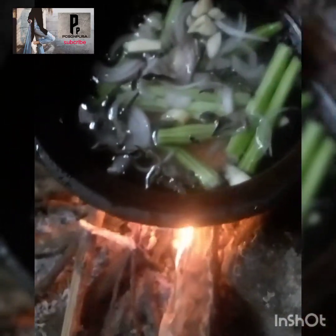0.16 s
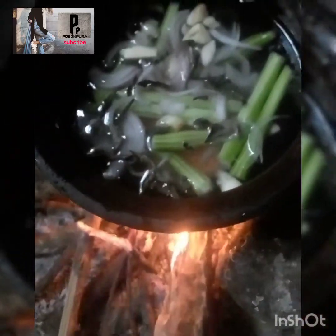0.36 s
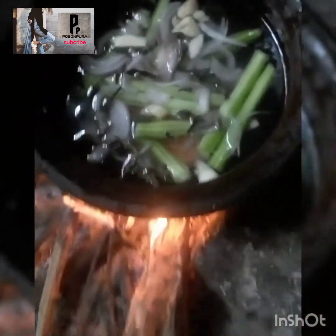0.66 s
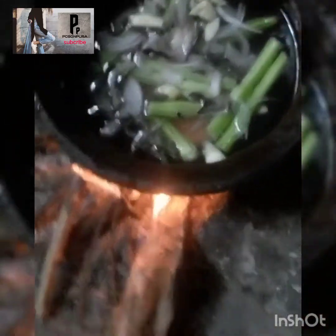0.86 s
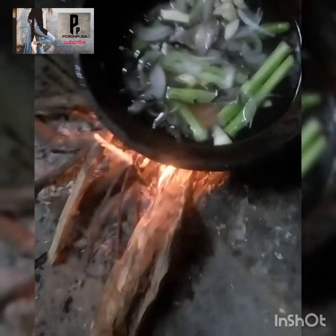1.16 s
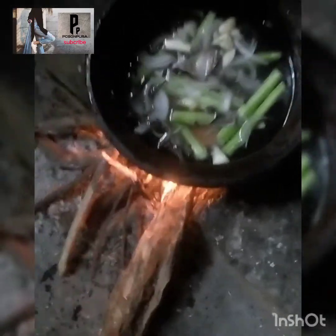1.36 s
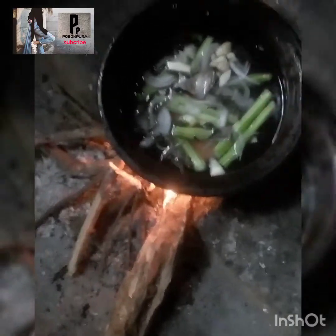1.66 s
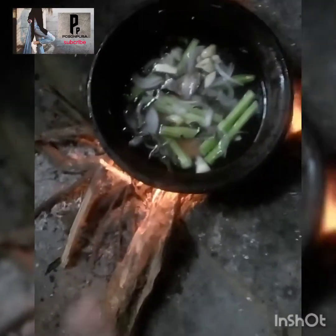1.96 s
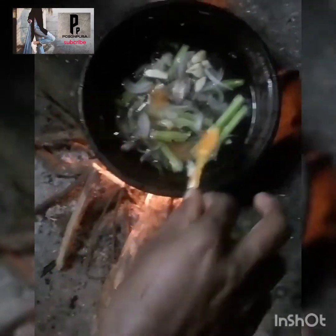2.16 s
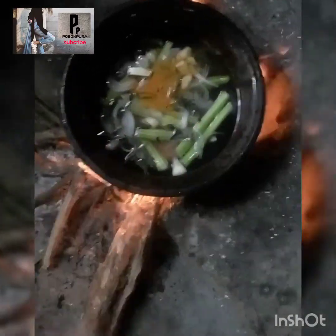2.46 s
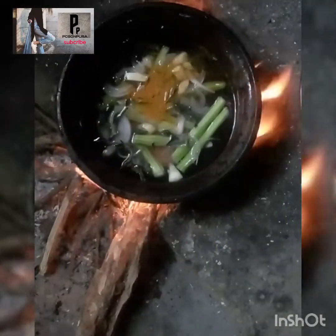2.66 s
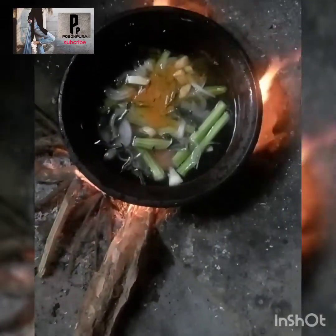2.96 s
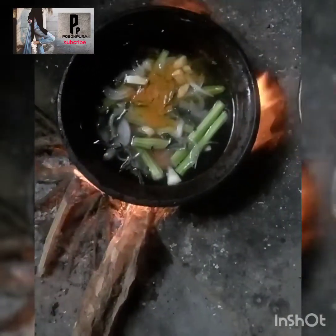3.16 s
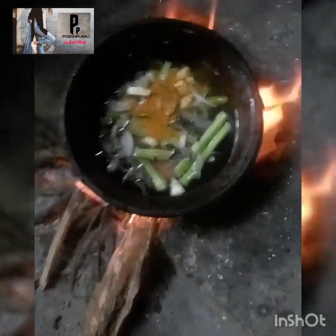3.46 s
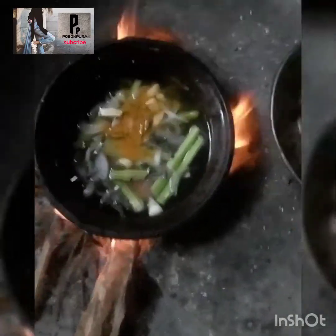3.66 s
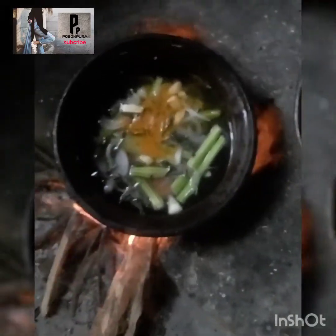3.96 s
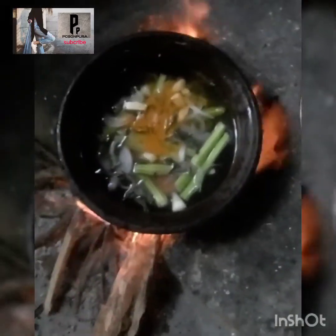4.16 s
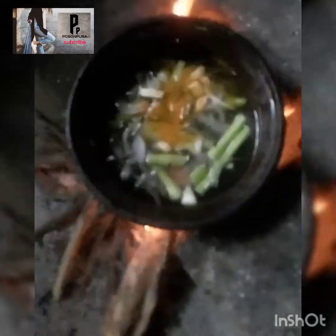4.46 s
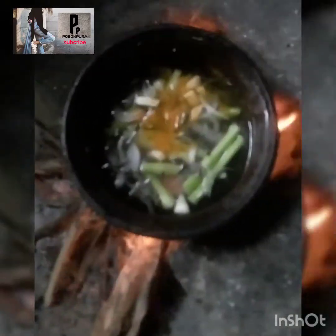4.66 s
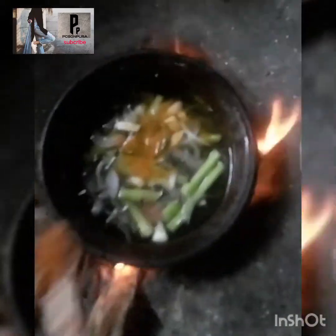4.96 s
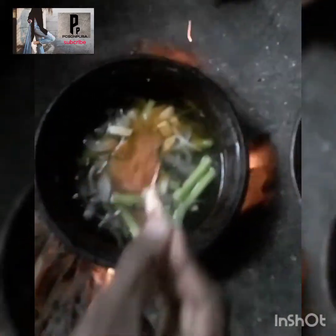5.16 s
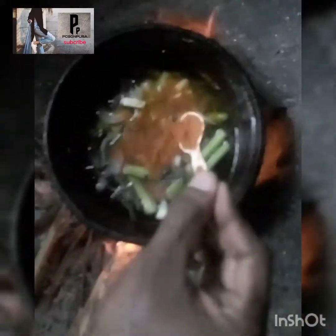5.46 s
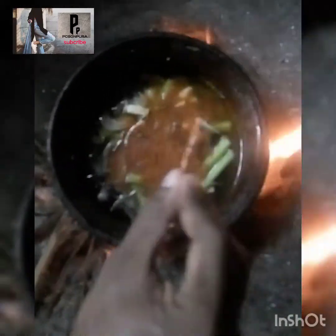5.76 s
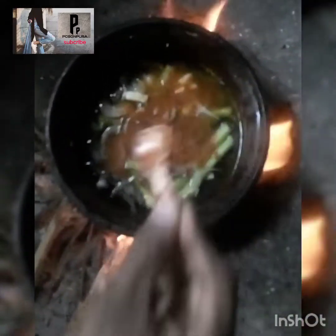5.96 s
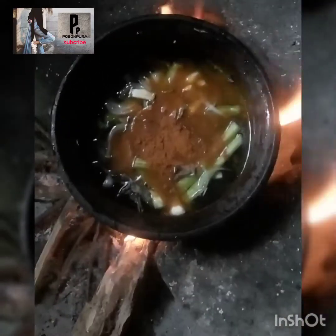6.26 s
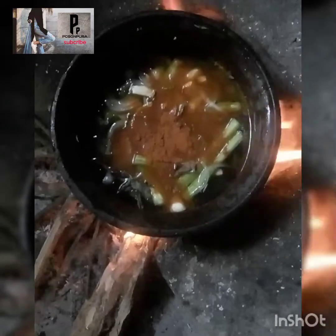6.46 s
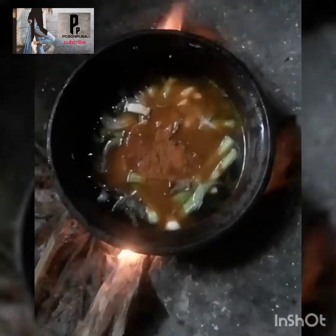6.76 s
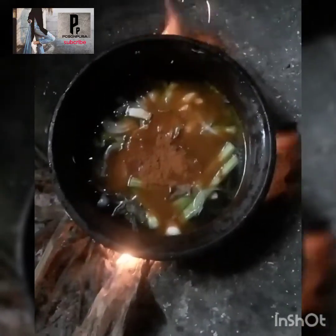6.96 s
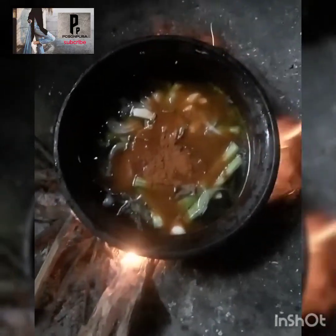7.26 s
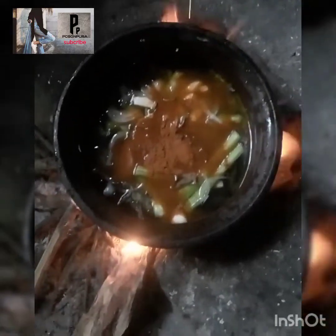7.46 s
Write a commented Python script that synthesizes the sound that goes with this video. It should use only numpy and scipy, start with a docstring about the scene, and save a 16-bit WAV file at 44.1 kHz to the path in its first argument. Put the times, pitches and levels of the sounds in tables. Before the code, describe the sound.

Small, slightly reverberant kitchen with a faint fire hiss, occasional sharp pops and brief sizzling flares. Regular woody scraping strokes run throughout, some landing with a harder knock, lighter drags between them. A quick clatter of hard taps comes early on. Later, heavy bumps hit the handheld microphone, which becomes covered: the rasping turns muffled and boomy to the end.

```python
"""A wood fire hisses as a coconut half is rasped over a toothed blade in even strokes: dense clicks ring the shell.
Now and then the fire flares up in the treble or pops, as bursts of filtered noise; something hard taps
nearby, as decaying modes. Halfway a finger slides over the microphone: it bumps as noise pulses and a filtered
impulse, the treble is muffled by gains in overlapping bands and a low rumble of noise grows.
"""
import sys
import numpy as np
from scipy import signal
from scipy.fft import rfft, irfft, next_fast_len
from scipy.io import wavfile

SR = 44100
rng = np.random.default_rng(int(sys.argv[2]) if len(sys.argv) > 2 else 0)


def pcm_store(signal):
    """Save signal as 16-bit PCM."""
    levels = np.round(np.clip(np.atleast_2d(signal), -1, 1) * 32767)
    wavfile.write(sys.argv[1], SR, levels.astype(np.int16).T)


N = 335160
PADDED = next_fast_len(N + SR // 4, real=True)
LOG_HZ = np.log(np.arange(PADDED // 2 + 1) * SR / PADDED + 1)   # the 1 Hz offset avoids log(0)

# Strokes of the nut over the blade: start t/s, landing peak level/dB, first touch level/dB, rise t/s,
# top level/dB, ease t/s, ease loss level/dB, release t/s, brightness level/dB, shake level/dB
STROKES = [(0.064, -31, -45, 0.038, -32.5, 0.13, 8, 0.13, 1.5, -44),
           (0.4293, -29, -47.5, 0.084, -33.5, 0.069, 4, 0.13, 1, -58),
           (0.7807, -20.5, -45.5, 0.12, -34, 0.023, 5, 0.11, 3, -49),
           (1.159, -34, -47, 0.11, -34, 0.091, 14.5, 0.056, 1, -47),
           (1.528, -39, -47, 0.12, -34.5, 0.034, 7, 0.14, 2, -53),
           (1.8997, -32, -46.5, 0.11, -31.5, 0.051, 12, 0.13, 1, -43),
           (2.3126, -29, -35.5, .1, -35, .01, 1.5, 0.16, -0.5, -46),
           (2.6595, -31.5, -51, 0.12, -30.5, 0.091, 16.5, 0.074, -0.5, -44),
           (3.065, -55, -54, .11, -32.5, 0.053, 9.5, 0.16, 1.5, -53),
           (3.424, -48, -51.5, 0.059, -32, 0.13, 12, 0.06, 2, -38.5),
           (3.7946, -18.5, -35.5, 0.074, -32, 0.087, 12.5, 0.066, 1.5, -41),
           (4.156, -27, -44.5, .047, -31.5, 0.11, 10, 0.052, 0.5, -46),
           (4.5052, -28.5, -51, 0.073, -36, 0.084, 3.5, 0.077, 3, -47),
           (4.87, -55, -55.5, 0.053, -39.5, 0.11, -1, 0.066, 2, -45),
           (5.27, -57, -56, 0.051, -37.5, 0.092, 0, 0.14, 5, -46),
           (5.65, -45, -51.5, 0.043, -35, 0.1, 5.5, 0.053, 3.5, -41),
           (6.049, -29, -31, 0.0041, -32.5, 0.098, 8, 0.16, 2, -42),
           (6.3956, -37, -47.5, 0.1, -32.5, 0.048, 5, 0.14, 0, -43),
           (6.7825, -47, -44.5, .106, -30.5, 0.035, 9.5, 0.17, 0.5, -41),
           (7.162, -26, -49.5, 0.099, -28, 0.043, 10.5, 0.15, 0.5, -41),
           (7.527, -29, -39, 0.11, -31.5, .05, 5, .1, 0.5, -39.5)]
# The nut drags back over the blade: t/s, peak level/dB, shake level/dB
RETURNS = [(0.319, -48.5, -52), (0.666, -53.5, -65), (1.029, -54, -52), (1.443, -61, -58),
           (1.81, -49.5, -53), (2.13, -67, -49), (2.282, -56, -51), (2.553, -63, -64), (3.014, -45.5, -47),
           (3.672, -43.5, -48), (4.056, -57, -56), (4.409, -52.5, -48.5), (5.545, -52, -41),
           (5.84, -48, -53), (6.329, -64, -47), (6.657, -59, -38.5), (7.037, -49.5, -41),
           (7.446, -49.5, -43)]
# The finger over the microphone port: t/s, covered share (0-1)
COVER = [(4.35, 0), (4.365, .45), (4.5, .5), (4.76, .6), (4.80, .88), (5.5, .97), (7.6, .99)]
# The finger knocks on the case: t/s, peak level/dB, rise t/s, fall t/s
BUMPS = [(4.768, -35.5, 0.0048, 0.021), (4.794, -10, 0.003, 0.0072), (5.285, -33, 0.02, 0.0072),
         (5.303, -13, 0.0087, 0.0069), (5.345, -22, 0.0076, 0.013), (5.424, -12.5, 0.0078, 0.014),
         (5.460, -33, 0.0064, 0.0088), (5.893, -17, 0.012, 0.0099)]


def from_db(db):
    """Level definition: amplitude ratio of a level in dB."""
    return 10 ** (np.asarray(db) / 20)


def rms_one(x):
    """Normalisation of power: scaled to unit rms."""
    return x / np.sqrt(np.mean(x ** 2) + 1e-20)


def in_time(rows):
    """Linear interpolation: columns of a curve table, one value a sample."""
    s, *columns = np.transpose(rows)
    return [np.interp(np.arange(N) / SR, s, c) for c in columns]


def coloured(x, spectrum):
    """Minimum-phase filtering by the folded cepstrum: causal, unit power gain for white noise."""
    hz, level_db = np.transpose(spectrum)
    gain = rms_one(from_db(np.interp(LOG_HZ, np.log(hz), level_db)))
    cepstrum = irfft(np.log(gain), PADDED)
    cepstrum[1:PADDED // 2] *= 2
    cepstrum[PADDED // 2 + 1:] = 0
    response = np.exp(rfft(cepstrum))
    return irfft(rfft(x, PADDED) * response, PADDED)[:N]


def drift(rate_hz):
    """Low-pass noise: a random modulation of spread 1, from two equal real poles."""
    r = np.exp(-2 * np.pi * rate_hz / SR)
    noise = rng.standard_normal(N + SR)
    settled = signal.lfilter([1], [1, -2 * r, r * r], noise)[SR:]
    return rms_one(settled)


def resonance(x, hz, width_hz):
    """Damped resonator: a two-pole peak of gain 1."""
    r = np.exp(-np.pi * width_hz / SR)
    zeros = np.array([1, 0, -1]) * (1 - r * r) / 2
    poles = [1, -2 * r * np.cos(2 * np.pi * hz / SR), r * r]
    return signal.lfilter(zeros, poles, x)


def above(x, hz):
    """Complementary band splitting: the part above hz, without delay so that the parts add up again."""
    return signal.sosfiltfilt(signal.butter(3, hz, "high", fs=SR, output="sos"), x)


def bursts(rows):
    """Exponential decay after a bell-shaped rise: envelope of (t/s, peak level/dB, rise t/s, t60/s) rows."""
    out = np.zeros(N)
    for s, peak_db, rise, t60 in rows:
        first, last = max(int((s - 4 * rise) * SR), 0), min(int((s + 2 * t60) * SR), N)
        at = np.arange(first, last)
        t = at / SR - s
        bell = np.exp(-(t / max(rise, 1e-5)) ** 2)
        out[at] += from_db(peak_db) * np.where(t < 0, bell, from_db(-60 * t / t60))
    return out


def grains(per_s, spread_db):
    """Impulsive excitation: random clicks of uneven size and either sign; rms 1."""
    sizes = from_db(spread_db * np.minimum(rng.exponential(1, N), 4)) * rng.choice([-1, 1], N)
    return rms_one(sizes * (rng.random(N) < per_s / SR))


def room(x):
    """Exponential reverberant decay: a dying noise tail, duller than the direct sound."""
    t60_s, level_db = 0.19, -12
    t = np.arange(SR // 2) / SR
    tail = rng.standard_normal(len(t)) * from_db(-60 * t / t60_s) * (t > .004)
    tail = signal.lfilter([1], [1, -.3], tail)   # gentle low-pass
    return signal.fftconvolve(x, from_db(level_db) * tail / np.sqrt(np.sum(tail ** 2)))[:N]


def fire_hiss():
    """Broadband noise: the steady hiss of fire and room, slightly unsteady in level."""
    # Hiss spectrum: f/Hz, relative density level/dB per Hz
    hiss_spectrum = [(59, -32), (100, -8.5), (185, -13.5), (365, -5), (752, -20), (1100, -17), (1650, -16),
                     (2520, -24.5), (5770, -21), (7940, -32.5), (16000, -35)]
    level_db = -56.5 + 0.33 * drift(3.9)
    return from_db(level_db) * coloured(rng.standard_normal(N), hiss_spectrum)


def fire_flares():
    """Amplitude-modulated noise: a log hisses up in the treble."""
    # Flares: t/s, peak level/dB, rise t/s, t60/s
    flare_rows = [(0.80, -64, 0.0091, 0.33), (3.51, -45.5, 0.016, 0.16), (3.565, -52, 0.0088, 0.076),
                  (3.845, -39.5, 0.021, 0.14), (3.92, -55, 0.024, 0.12), (4.21, -62, 0.016, 0.41),
                  (4.60, -59, 0.065, 0.54)]
    # Flare spectrum: f/Hz, relative density level/dB per Hz
    flare_spectrum = [(5000, -28), (8500, -3), (11000, -3), (13500, 1), (16000, -4)]
    return bursts(flare_rows) * coloured(rng.standard_normal(N), flare_spectrum)


def fire_pops():
    """Transient noise decay: each pop is a snap with a short spit, balanced in two bands."""
    # Pops: t/s, peak level/dB, spit t60/s, level of the lower band against the upper/dB
    pop_rows = [(1.4416, -20, 0.055, -3.5), (2.2792, -35, 0.08, 9), (2.882, -43, 0.06, -4),
                (2.96, -46, 0.071, 5), (3.209, -29, 0.078, 14), (4.724, -44, 0.06, 6),
                (4.9392, -51, 0.06, 1), (5.1147, -22, 0.077, 0.5), (5.697, -32.5, 0.068, 12),
                (5.796, -28, 0.068, 19.5), (6.512, -29, 0.066, 2)]
    # Pop spectrum: f/Hz, relative density level/dB per Hz
    pop_spectrum = [(300, -13), (1000, -6.5), (3000, -7), (6000, -4), (8000, -9.5), (12900, 0.5),
                    (16000, 10)]
    spit_db = -10.5   # the spit against the snap
    noise = coloured(rng.standard_normal(N), pop_spectrum)
    upper = above(noise, hz=6500)
    pops = np.zeros(N)
    for band, is_lower in ((upper, 0), (noise - upper, 1)):
        snaps = bursts([(s, db + is_lower * low_db, .0001, .006) for s, db, t60, low_db in pop_rows])
        spits = bursts([(s, db + is_lower * low_db + spit_db, .0001, t60) for s, db, t60, low_db in pop_rows])
        pops += (snaps + spits) * band
    return pops


def taps():
    """Modal superposition: each tap strikes every mode with a strength of its own, plus a short crack."""
    # Something hard taps nearby: t/s, peak level/dB
    tap_rows = [(2.955, -35), (2.962, -23), (2.974, -23), (2.981, -15), (2.9841, -22.5)]
    # Modes of the tapped thing: f/Hz, relative level/dB, t60/s
    tap_modes = [(394, -2, 0.016), (835, 2.5, 0.028), (1140, -4, 0.012), (1853, -6, 0.044), (2310, -6, .02),
                 (2970, 5, 0.017), (4050, -5, 0.017), (4670, -10, 0.015), (5270, -7, 0.02),
                 (6050, -23, .012)]
    mode_share_db, crack_db = -17, -10.5   # one mode and the crack against the whole tap
    at, peak_db = np.transpose(tap_rows)
    crack = resonance(rng.standard_normal(N), hz=4650, width_hz=800)
    out = bursts([(s, db, .0002, .02) for s, db in tap_rows]) * from_db(crack_db) * crack
    for hz, level_db, t60 in tap_modes:
        clicks = np.full(N, 1e-18)   # a tiny offset keeps the filter out of denormal numbers
        strength_db = peak_db + level_db + mode_share_db + rng.normal(0, 2.5, len(at))
        clicks[(at * SR).astype(int)] = from_db(strength_db)
        r, w = from_db(-60 / (t60 * SR)), 2 * np.pi * hz / SR
        out += signal.lfilter([0, np.sin(w)], [1, -2 * r * np.cos(w), r * r], clicks)
    return out


def covered(x):
    """Frequency-dependent transmission loss: overlapping bands follow the covered share of the port."""
    # Muffling: f/Hz, gain level half covered/dB, gain level fully covered/dB
    muffle_rows = [(100, -9, -2), (674, 0.4, -3.1), (1600, 2, -4.5), (2540, 3, -8.5), (3470, 1.5, -14),
                   (4400, 3.5, -21.5), (5360, -1, -27.5), (6700, -11, -29.5), (8040, -14.5, -24),
                   (9730, -5, -12), (11160, 4, -3), (15500, -0.5, -29)]
    share, = in_time(COVER)
    hz, half_db, full_db = np.transpose(muffle_rows)
    spectrum, out = rfft(x, PADDED), np.zeros(N)
    for k, one_band in enumerate(np.eye(len(hz))):
        band = irfft(spectrum * np.interp(LOG_HZ, np.log(hz), one_band), PADDED)[:N]
        gain_db = np.interp(share, [0, .5, 1], [0, half_db[k], full_db[k]])
        out += from_db(gain_db) * band
    return out


def presses():
    """Gaussian pulses: envelope of the finger's knocks, each with a rise and a fall of its own."""
    out = np.zeros(N)
    for s, peak_db, rise, fall in BUMPS:
        at = np.arange(int((s - .1) * SR), int((s + .1) * SR))
        t = at / SR - s
        out[at] += from_db(peak_db) * np.exp(-(t / np.where(t < 0, rise, fall)) ** 2)
    return out


def pressure():
    """Contact force as a level contour: level, brightness and shake (all dB) over touch, rise, ease, release."""
    touch_s, lifted_db = 0.0032, -71
    light_brightens, bright_max_db = 0.38, 11.5   # dB of treble gained for each dB below the top; its limit
    shake_follows = 0.98   # dB of shake lost for each dB below the top
    rows = []
    for s, landing_db, first_db, rise, top_db, ease, loss_db, release, bright_db, shake_db in STROKES:
        times = s + np.cumsum([0, touch_s, rise, ease, release])
        levels = np.array([lifted_db, first_db, top_db, top_db - loss_db, lifted_db])
        below_db = top_db - levels
        brightness = np.minimum(bright_db + light_brightens * below_db, bright_max_db)
        rows += zip(times, levels, brightness, shake_db - shake_follows * below_db)
    return in_time(sorted(rows))


def shaking():
    """Superposed vibration envelopes: the low rumble swells with strokes, returns and knocks."""
    # Continuous rumble under everything, with a thump at 6.81 s: t/s, level/dB
    rumble_rows = [(0, -64), (1.2, -62), (1.7, -52.5), (2.5, -56), (3.4, -52), (4.2, -52.5), (4.7, -45),
                   (5.1, -43), (5.25, -40.5), (5.6, -48), (6.0, -47), (6.4, -47.5), (6.77, -50),
                   (6.81, -34.5), (6.88, -48), (7.2, -40.5), (7.6, -40)]
    lag_s, rise_s, t60_s = 0.023, 0.018, 0.21   # under the returns
    after_db, after_s, after_t60_s = -20, 0.016, 0.15   # rumble that a knock leaves behind
    shake_db = pressure()[-1]
    level_db, = in_time(rumble_rows)
    returns = bursts([(s + lag_s, db, rise_s, t60_s) for s, level, db in RETURNS])
    knocks = bursts([(s + after_s, db + after_db, after_s / 2, after_t60_s) for s, db, rise, fall in BUMPS])
    return from_db(level_db) + from_db(shake_db) + returns + knocks


def handling():
    """Structure-borne sound and cavity resonance: knocks and a lumpy rumble reach the capsule by the case."""
    # Knock spectrum: f/Hz, relative density level/dB per Hz
    knock_spectrum = [(24, -41), (40, -2), (276, -4), (1410, -24), (1680, -24), (1850, -27.5), (4340, -53),
                      (7000, -76.5), (11800, -62.5), (16000, -71)]
    # Rumble spectrum: f/Hz, relative density level/dB per Hz
    rumble_spectrum = [(15, -44), (25, 0.5), (110, -3.5), (170, -17), (230, -23), (292, -21), (500, -47),
                       (650, -69), (1100, -120)]
    blow_s, blow_db, blow_hz = 4.7895, 15, 2960   # one hard blow of a soft fingertip
    open_low_hz, open_loss = 60, .7   # with the port open this share of the deepest rumble escapes
    case_hz, case_width_hz, case_db = 64.8, 5.9, -8   # air shut in under the finger booms
    blow = from_db(blow_db) * (np.arange(N) == int(blow_s * SR))
    blow = signal.sosfilt(signal.butter(4, blow_hz, fs=SR, output="sos"), blow + 1e-18)
    lumps = from_db(2.26 * drift(12.2))
    rumble = shaking() * lumps * coloured(rng.standard_normal(N), rumble_spectrum)
    share, = in_time(COVER)
    deepest = rumble - above(rumble, open_low_hz)
    rumble = rumble - open_loss * (1 - share) * deepest
    knocks = coloured(presses() * rng.standard_normal(N) + blow, knock_spectrum)
    shaken = knocks + rumble
    return shaken + from_db(case_db) * resonance(shaken, case_hz, case_width_hz)


def scraper():
    """Impulsive excitation of modes: teeth tear the flesh in dense clicks that ring the shell."""
    # Rings of shell and stool: f/Hz, width/Hz, relative level/dB
    shell_modes = [(128.6, 23, -3.5), (269.4, 25, 4.5), (365, 22, -9), (575, 13, -6), (597, 68, -1),
                   (677.6, 64, 8), (773.5, 112, -2), (1088, 24, -9), (1210, 58, -9.5), (1557, 23, -6),
                   (1685, 140, -14.5), (2036, 15, -18), (2140, 24, -25), (2510, 210, -15), (2920, 23, -60),
                   (3644, 43, -26.5), (5390, 320, -26), (6940, 52, -33)]
    # Broad rasp spectrum: f/Hz, relative density level/dB per Hz
    rasp_spectrum = [(35, -30), (60, -5.5), (133, -18), (212, -23.5), (268, -16.5), (417, -5.5),
                     (607, -2.5), (903, -10.5), (1220, -10.5), (2900, -18.5), (6740, -27.5), (7940, -36),
                     (16000, -38.5)]
    # Landing click spectrum: f/Hz, relative density level/dB per Hz
    landing_spectrum = [(150, -25), (700, -9.5), (1600, -1.5), (2500, -3), (3500, -10.5), (6600, -15.5),
                        (7800, -20.5), (11000, -23), (16000, -25)]
    # A tooth catches in mid-stroke and the rasp surges: t/s, tick peak level/dB, surge level/dB
    catch_rows = [(0.0925, -30, -41.5), (0.21, -45, -39), (0.51, -47, -40), (0.868, -42, -33.5),
                  (1.24, -33, -40.5), (1.645, -42, -45.5), (1.996, -44, -32.5), (2.33, -45, -34),
                  (2.385, -45, -36), (2.5142, -33, -51), (2.765, -45, -37), (3.112, -42, -38),
                  (3.165, -48, -38.5), (3.205, -45, -36), (3.4845, -40, -40), (3.7618, -47, -53),
                  (3.85, -42, -37.5), (4.198, -38, -36.5), (4.57, -41, -34.5), (5.695, -42, -42),
                  (6.495, -45, -34), (6.12, -45, -38), (6.8458, -27, -40), (7.245, -42, -34)]
    shell_db, sway_db = 3, 3   # rings against the broad rasp; the grip shifts, and each ring swells and fades
    return_rise_s, return_t60_s, return_bright_db = .012, 0.19, -5.5
    surge_rise_s, surge_t60_s = 0.004, 0.09
    crest_db, landing_t60_s = 17.5, 0.16   # peak over rms of the clicks; ring of the landing

    teeth = grains(per_s=6000.0, spread_db=1.5)
    broad = coloured(teeth, rasp_spectrum)
    rings = np.zeros(N)
    for k, (hz, width_hz, db) in enumerate(shell_modes):
        swell = from_db(db + sway_db * drift(11.8))
        rings += (-1) ** k * swell * rms_one(resonance(teeth, hz, width_hz))   # alternating polarity
    body = rms_one(broad + from_db(shell_db) * rms_one(rings))
    treble = above(body, hz=2030)

    level_db, bright_db, shake_db = pressure()
    surges = bursts([(s, db, surge_rise_s, surge_t60_s) for s, tick, db in catch_rows])
    stroke_level = np.hypot(from_db(level_db), surges)   # powers add
    strokes = stroke_level * (body + (from_db(bright_db) - 1) * treble)
    returns = bursts([(s, db, return_rise_s, return_t60_s) for s, db, shake in RETURNS])
    drags = returns * (body + (from_db(return_bright_db) - 1) * treble)
    chatter_db = 0.61 * drift(20) + 0.98 * drift(62)   # the nut judders on the blade

    hits = [(s, db - crest_db, .0012, landing_t60_s) for s, db, *rest in STROKES + catch_rows]
    landings = coloured(bursts(hits) * grains(per_s=25000.0, spread_db=4.0), landing_spectrum)
    return from_db(chatter_db) * (strokes + drags) + landings


def scene():
    """Linear superposition: airborne sound passes the covered port, handling comes by the case."""
    near = fire_pops() + fire_flares() + taps() + scraper()
    airborne = near + room(near) + fire_hiss()
    return (covered(airborne) + handling())[None]


def record(dry):
    """Band limiting and soft saturation: deepest bass drops, strong peaks are rounded, the top is cut."""
    dry = signal.sosfilt(signal.butter(2, 49.4, "high", fs=SR, output="sos"), dry)
    dry = dry / (1 + dry ** 4) ** .25
    return signal.sosfilt(signal.cheby2(16, 70, 16250, fs=SR, output="sos"), dry)


dry = scene()
out = record(dry)
pcm_store(out)
```